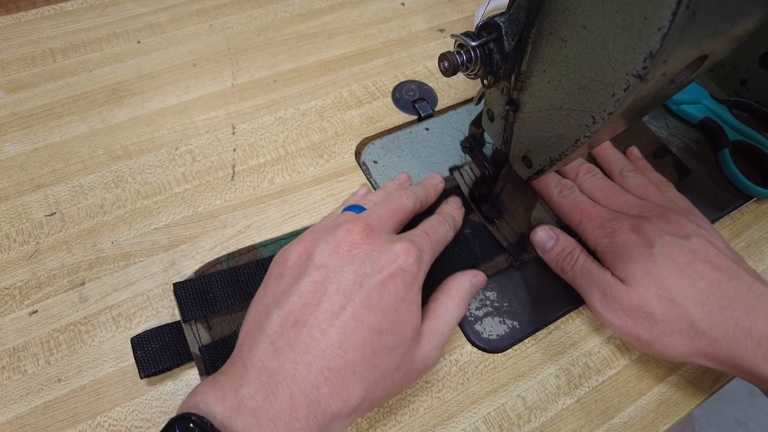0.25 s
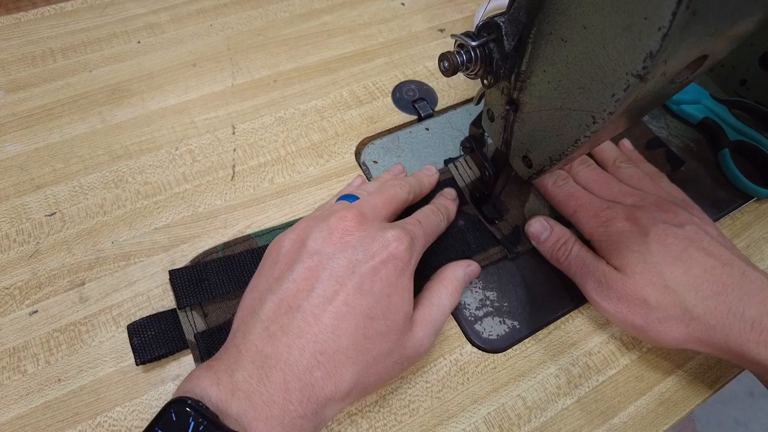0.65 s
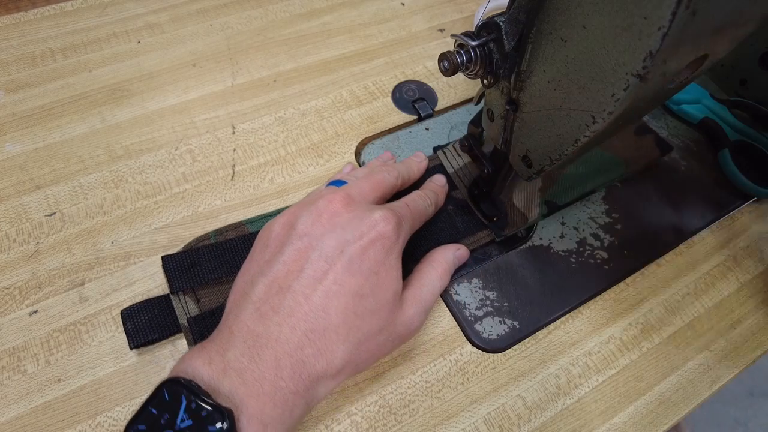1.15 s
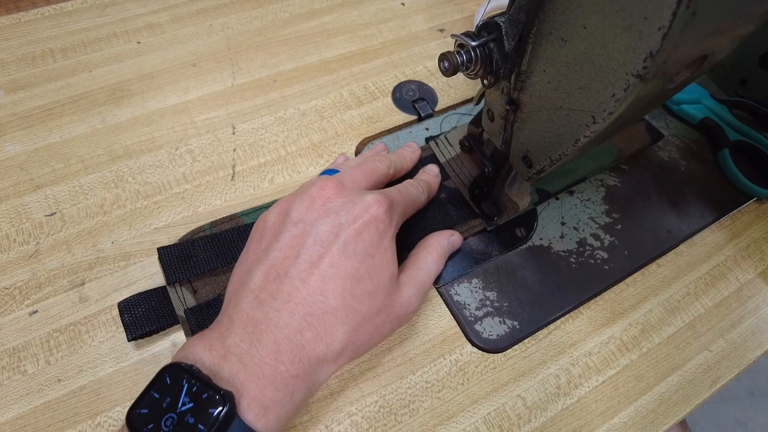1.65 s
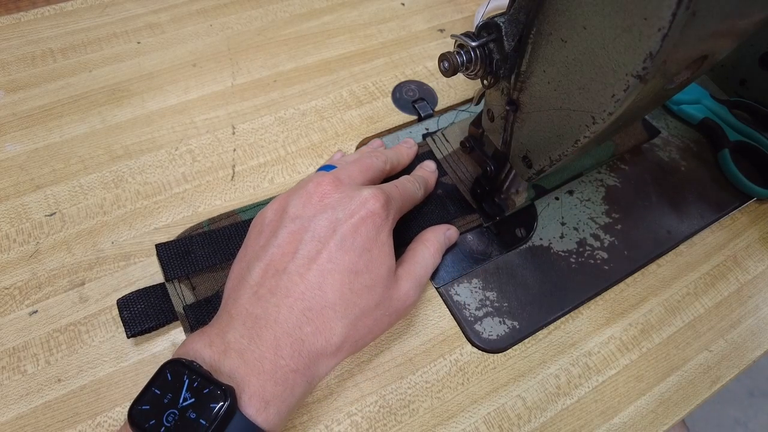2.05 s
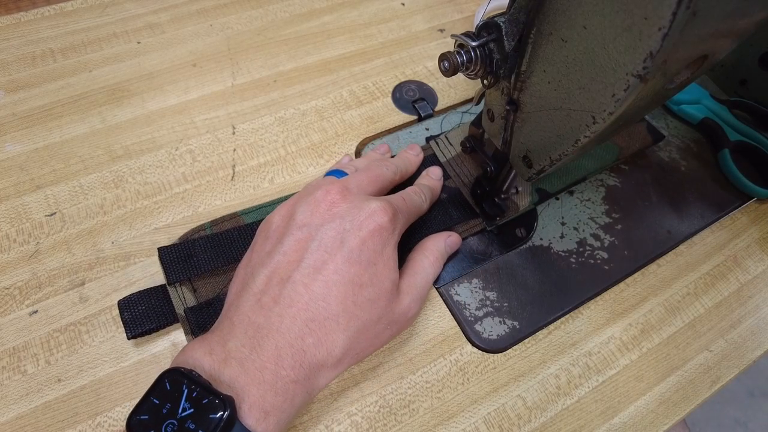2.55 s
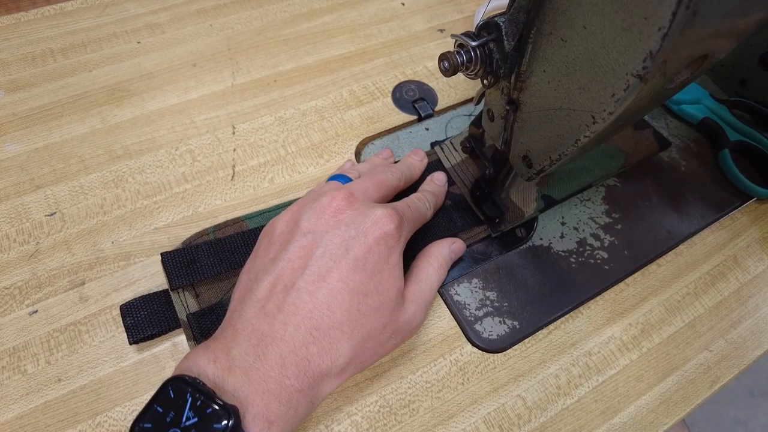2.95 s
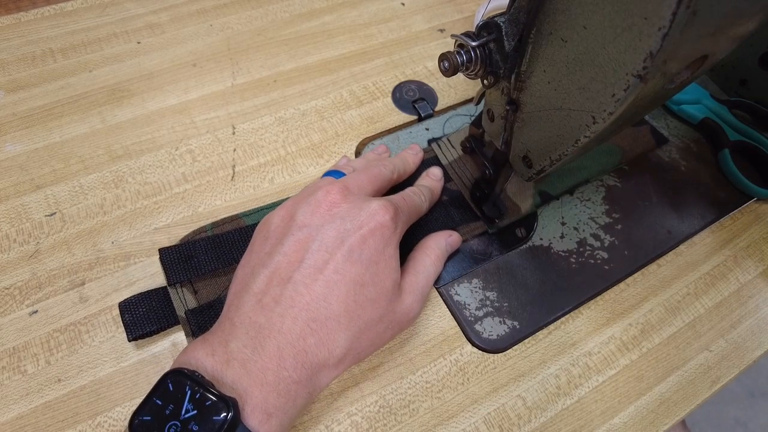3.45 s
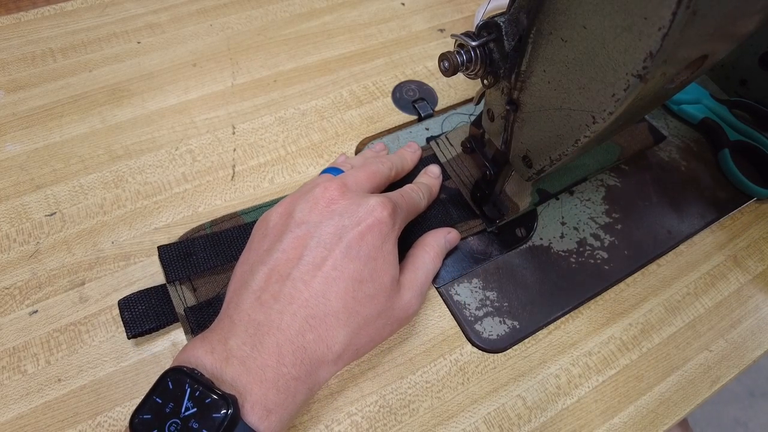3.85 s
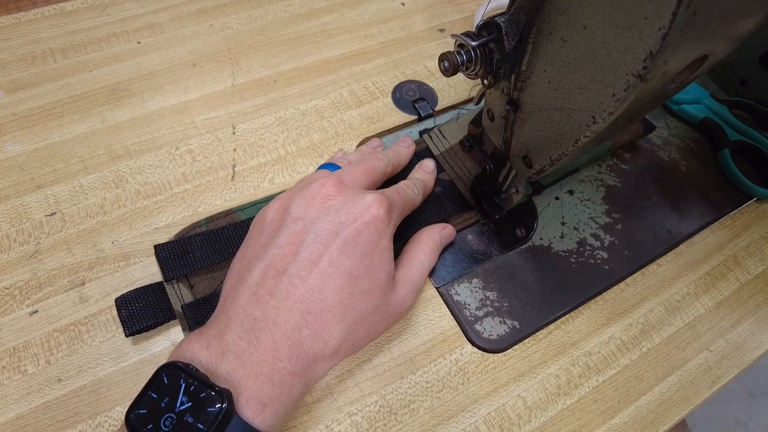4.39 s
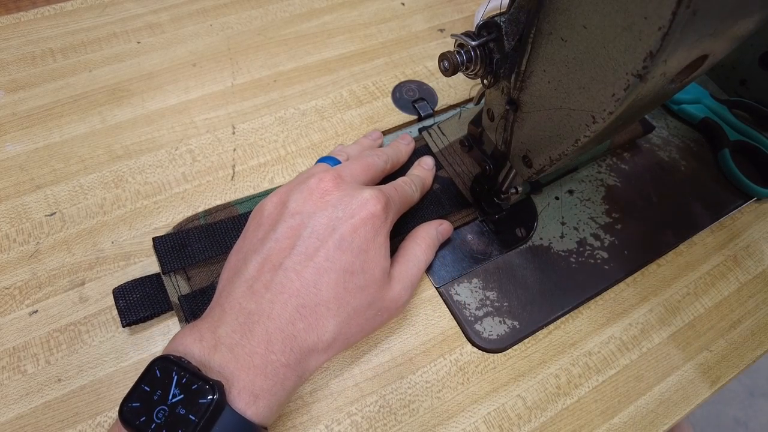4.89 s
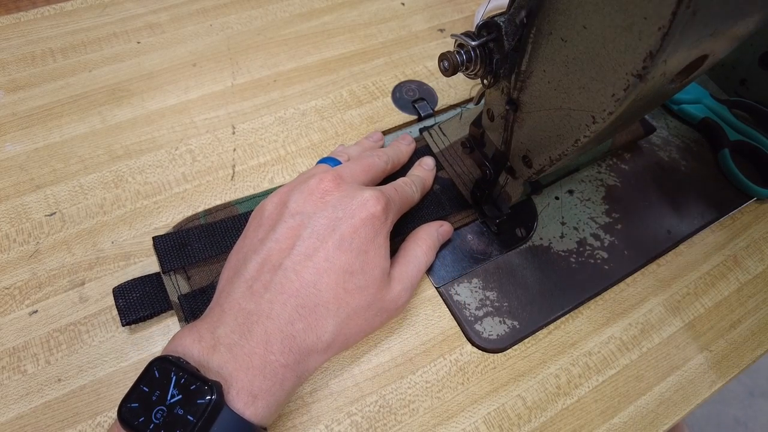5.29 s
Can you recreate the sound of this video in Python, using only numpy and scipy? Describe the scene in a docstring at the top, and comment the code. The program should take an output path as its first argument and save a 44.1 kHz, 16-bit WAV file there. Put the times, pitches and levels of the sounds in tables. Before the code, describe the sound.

Close stereo sound of a heavy industrial sewing machine on a wooden bench in a small, fairly dry workshop. It is already stitching at 0 s, about six a second, quickening to nearly nine around 1.2 s. Every stitch combines a hard steel foot knock, little hook and feed ticks, a deep bench boom near 120 Hz and a snapping take-up, with webbing rasp, grainy clatter and hiss. From 1.6 s it slows, with separate, weaker stitches at 2.2 and 2.5 s. A second burst runs from 2.7 to 3.3 s, then slows to a faint contact near 3.9 s and a short standstill. The clutch bites with a thump at 4.1 s; stitches follow at 4.25, 4.4 and 4.5 s. A brief brake rub and low shudder end it around 4.7 s. Low, wavering motor hum and soft fan air remain to 5.5 s, with a small webbing rustle and ticks near 5.25 s.

```python
"""Walking-foot sewing machine

A heavy machine on a wooden bench stitches webbing in three short bursts in a small workshop; the motor hums on.
Each shaft turn is one stitch: the foot knocks, hook and feed tick, the punch booms the bench, the take-up snaps back.
Noise-driven steel modes make the contacts; chirped cosines the booms; short swelling and fading cosines the stand;
sines the motor. Shaped grains and noise make clatter, hiss, webbing, brake and fan; clatter and hiss rise with speed."""
import sys
import numpy as np
from scipy import signal
from scipy.fft import rfft, irfft
from scipy.io import wavfile
from scipy.ndimage import uniform_filter1d, map_coordinates

SR = 44100
rng = np.random.default_rng(int(sys.argv[2]) if len(sys.argv) > 2 else 0)


def dump(signal):
    """Clip the signal to [-1, 1] and save it as 16-bit WAV at the path in sys.argv[1]."""
    limited = np.clip(np.atleast_2d(signal).T, -1, 1)
    pcm = np.round(limited * 32767).astype(np.int16)
    wavfile.write(sys.argv[1], SR, pcm)


N = 243873
T = np.arange(N) / SR


def amp(db):
    """Decibels to gain."""
    return 10 ** (np.asarray(db) / 20)


def rms_one(x):
    """Scale to unit power."""
    return x / np.sqrt(np.mean(x ** 2) + 1e-20)


def in_time(rows):
    """Interpolate the level column of a (time, level) curve at every sample."""
    time_s, level_db = np.transpose(rows)
    return np.interp(T, time_s, level_db)


def per_bin(points):
    """Interpolate a spectrum table over log frequency at every FFT bin."""
    hz, value = np.transpose(points)
    bin_hz = np.arange(N // 2 + 1) * SR / N
    return np.interp(np.log(bin_hz + 1), np.log(hz), value)


def drift(rate_hz):
    """Smooth random curve of unit power through random knots."""
    knots = rng.standard_normal(int(T[-1] * rate_hz) + 4)
    return rms_one(map_coordinates(knots, [T * rate_hz + 1], order=3))


def swell(peak_s, rise_db_per_s, fall_db_per_s):
    """Gain that climbs to one and dies away, both linearly in dB."""
    slope_db = np.minimum(rise_db_per_s * (T - peak_s), fall_db_per_s * (peak_s - T))
    return amp(np.maximum(slope_db, -120))


def resonate(x, modes):
    """Parallel two-pole resonances (pitch_hz, width_hz, gain_db) with alternating signs."""
    out = 0
    for k, (pitch_hz, width_hz, gain_db) in enumerate(modes):
        r = np.exp(-np.pi * width_hz / SR)
        zeros = np.array([1, 0, -1]) * (1 - r * r) / 2
        poles = [1, -2 * r * np.cos(2 * np.pi * pitch_hz / SR), r * r]
        out = out + (-1) ** k * amp(gain_db) * signal.lfilter(zeros, poles, x)
    return out


def grains(per_s, spread_db, smooth_db):
    """Dense tiny contacts of uneven size over smooth friction noise."""
    hits = rng.random(N) < per_s / SR
    sizes = amp(spread_db * np.minimum(rng.exponential(1, N), 4)) * hits
    contact = rms_one(sizes * rng.choice([-1, 1], (2, N)))
    return rms_one(contact + amp(smooth_db) * rng.standard_normal((2, N)))


def coloured(x, spectrum, edge_hz):
    """Give a signal a spectrum, cut it below an edge and scale to unit power."""
    shaped = irfft(rfft(x) * amp(per_bin(spectrum)), N)
    low_cut = signal.butter(2, edge_hz, "high", fs=SR, output="sos")
    return rms_one(signal.sosfilt(low_cut, shaped))


# bench and bed plate modes: pitch_hz, width_hz, gain_db
BENCH_MODES = [(152, 23.5, 2.5), (211.7, 22, 2.5), (291.8, 25, 1.5), (350, 59.6, -3), (421, 49.7, -1.5),
               (603.4, 40, -7), (774, 74, -9.5)]


def bench(force):
    """The wooden bench and bed plate ring low and absorb the treble."""
    band = signal.butter(2, [130, 1000], "band", fs=SR, output="sos")
    return signal.sosfilt(band, resonate(force, BENCH_MODES))


# one stitch per shaft turn: foot_s, knock_db, boom_db, rock_db, feed_tick_db, take_up_tick_db
STITCHES = [(-.02, -28.5, -18.5, -26, -40, -34.5), (.149, -29, -17.5, -33, -36.5, -32),
            (0.3097, -31, -14.5, -38, -39, -32), (.4541, -29.5, -14.5, -34, -39, -32.5),
            (0.591, -31, -19, -33, -30.5, -35.5), (0.7194, -30, -16, -37, -29.5, -33),
            (0.8434, -31.5, -15, -34, -42, -37.5), (.963, -29.5, -14.5, -37, -41, -28.5),
            (1.081, -30.5, -15.5, -31, -32.5, -33), (1.1918, -30.5, -12.5, -33, -29.5, -40),
            (1.3038, -29.5, -17, -37, -42, -36), (1.4225, -31.5, -15.5, -36, -40, -39.5),
            (1.549, -31.5, -17, -32, -38, -37.5), (1.6833, -30.5, -16, -30, -38, -39),
            (1.8344, -32, -21, -28, -36.5, -36.5), (2.0071, -28.5, -23, -33, -39, -39.5),
            (2.2369, -31, -28.5, -32, -56, -58), (2.5165, -33.5, -34, -33.5, -51, -47),
            (2.724, -33.5, -17.5, -35, -36, -37), (2.8711, -29.5, -15.5, -39, -35, -32),
            (2.9916, -28.5, -16.5, -35, -35, -30), (3.0952, -28, -14.5, -36, -43, -34),
            (3.2033, -28.5, -19.5, -37, -46, -34), (3.3339, -32.5, -20.5, -31, -55, -43.5),
            (3.504, -31, -28.5, -31, -47, -63), (3.8648, -41.5, -47, -54, -49, -36),
            (4.252, -31, -15.5, -32, -38, -33), (4.3901, -29.5, -14, -29, -33.5, -37),
            (4.5324, -35.5, -30.5, -32, -36.5, -64)]
STOP_S = 4.72                    # last turn ends
PAUSE_S, PAUSE_LENGTH_S = 3.98, .16  # shaft stands still within one slow stitch


def time_of(turns):
    """Time of a shaft angle: a smooth curve through the falls of the foot, with one pause."""
    falls_s = np.array([row[0] for row in STITCHES] + [STOP_S])
    running_s = falls_s - PAUSE_LENGTH_S * (falls_s > PAUSE_S)
    running_s = np.pad(running_s, 4, "reflect", reflect_type="odd")
    s = map_coordinates(running_s, [turns + 4], order=3, mode="nearest")
    return s + PAUSE_LENGTH_S * (s > PAUSE_S)


def strikes(turn_share, lag_s):
    """When one part strikes in every stitch: share of a turn after the foot, plus lag from linkage play."""
    return time_of(np.arange(len(STITCHES)) + turn_share) + lag_s


BRAKE_S, BRAKING_DB_PER_S = 4.613, 71
FULL_SPEED_PER_S = 8   # stitch rate at which the speed-dependent levels hold
CREEP_PER_S = 2.23     # slipping clutch keeps the gear as noisy as at this stitch rate


def shaft():
    """Shaft angle (turns) and its noise-driving speed (doublings above full speed) at every sample."""
    turns = np.linspace(0, len(STITCHES), N)
    angle = np.interp(T, time_of(turns), turns)
    speed = uniform_filter1d(np.gradient(angle, T), size=SR // 5)
    speed = np.maximum(speed, CREEP_PER_S)
    braking = amp(-BRAKING_DB_PER_S * np.maximum(T - BRAKE_S, 0))
    speed = np.where(T < BRAKE_S, speed, np.interp(BRAKE_S, T, speed) * braking)
    return angle, np.log2(np.abs(speed) / FULL_SPEED_PER_S + 1e-9)


# fan air spectrum: pitch_hz, density_db (relative, per Hz)
FAN = [(30, 12), (50, -4), (80, 5.5), (200, -6.5), (420, -3.5), (680, -23), (950, -25.5), (1300, -16),
       (1900, -27.5), (2800, -24), (5500, -33), (7000, -37), (9000, -34), (15000, -55)]


def fan():
    """Fan air of the idling motor: steady coloured noise."""
    return amp(-46.5) * coloured(rng.standard_normal((2, N)), FAN, edge_hz=34)


# hum at twice the mains rate: time_s, level_db
HUM = [(.15, -34), (.45, -28.5), (.72, -37.5), (1.97, -31), (2.5, -34.5), (2.66, -27.5), (2.73, -33.5),
       (3.5, -32.5), (3.92, -29), (4.07, -35), (4.65, -31.5), (4.8, -27), (5.15, -26), (5.33, -31.5),
       (5.53, -25.5)]
# lines of motor and pulley: pitch_hz, level_db (before waver)
MOTOR_LINES = [(48.6, -55.5), (178, -85), (238, -53.5), (280, -58.5), (360, -55), (603, -65), (764, -74)]


def motor(waver_db):
    """Mains hum, swelling and sinking, with faint lines unsteady in level and phase."""
    hum_hz = 120
    hum = amp(in_time(HUM)) * np.sin(2 * np.pi * hum_hz * T + 0.16 * drift(3.79))
    lines = 0
    for pitch_hz, level_db in MOTOR_LINES:
        level = amp(level_db + waver_db * drift(7))
        lines = lines + level * np.sin(2 * np.pi * pitch_hz * T + 1.08 * drift(6))
    return np.sqrt(2) * (hum + lines)


# bench rumble, before the punches' load: time_s, level_db
RUMBLE = [(0, -39.5), (.45, -41), (1.05, -37.5), (1.85, -39), (2.1, -37), (2.24, -43.5), (2.7, -40.5),
          (3.1, -36.5), (3.55, -40.5), (3.8, -50.5), (4.1, -50.5), (4.35, -41.5), (4.6, -39.5),
          (4.95, -53.5), (5.53, -52)]
# clatter spectrum: pitch_hz, density_db (relative, per Hz)
CLATTER = [(500, 0), (800, 0.5), (950, 1), (1350, 3.5), (1750, 0), (2150, -1.5), (2700, -1), (3300, -1),
           (3650, -8.5), (4200, -3.5), (5000, -14), (6500, -24.5)]
# hiss spectrum: pitch_hz, density_db (relative, per Hz)
HISS = [(4000, 0.5), (5000, 2), (5650, -0.5), (6900, -1.5), (7550, 0), (8300, -1), (9200, -2),
        (10200, -4.5), (11400, -2), (14000, -11.5), (15500, -5.5)]


def running_gear(angle, speed, load):
    """Clatter and hiss grow with speed and swell once a turn; bench rumble follows its own curve and the punches."""
    def level(full_speed_db, db_per_doubling, swing_db, peak_turn):
        swing = swing_db * np.cos(2 * np.pi * (angle - peak_turn))
        return amp(full_speed_db + db_per_doubling * speed + swing)

    drive = grains(per_s=450, spread_db=2.5, smooth_db=1.5) * amp(3.2 * drift(110))
    rub = rms_one(drive + amp(3.5) * rng.standard_normal((2, N)))   # thread and webbing slide more evenly
    shaking = rms_one(bench(grains(per_s=300, spread_db=3.5, smooth_db=-2.5)))
    rumble = shaking * amp(in_time(RUMBLE) + 5.5 * load)
    clatter = coloured(drive, CLATTER, edge_hz=360) * level(-42.5, 7, 1, 0.3)
    hiss = coloured(rub, HISS, edge_hz=2760) * level(-45.5, 11.5, 1.6, 0.27)
    return rumble + clatter + hiss


def webbing_shift():
    """The webbing shifts under the hand after the stop, rubbing briefly over the bed plate."""
    rub = grains(per_s=300, spread_db=5.5, smooth_db=2.0)
    rustle = amp(-52.5) * coloured(rub, CLATTER, edge_hz=350)
    rumble = amp(-50.5) * rms_one(bench(rub))
    return (rustle + rumble) * swell(peak_s=5.245, rise_db_per_s=303, fall_db_per_s=31)


def webbing_drag():
    """After each fall of the foot the feed rasps the webbing over the plate, harder after a harder knock."""
    foot_s, knock_db = np.transpose(STITCHES)[:2]
    last = np.maximum(np.searchsorted(foot_s, T) - 1, 0)
    fade_db_per_s = 103
    pull = amp(knock_db[last] - fade_db_per_s * (T - foot_s[last]))
    pull = uniform_filter1d(pull, size=300)
    rub = grains(per_s=900, spread_db=2.0, smooth_db=4.5)
    hiss = amp(-16) * coloured(rub, HISS, edge_hz=2400)
    clatter = amp(-19) * coloured(rub, CLATTER, edge_hz=1020)
    return pull * (hiss + clatter)


# head modes that sing under the brake: pitch_hz, width_hz, gain_db
RING_MODES = [(1290, 110, 1), (7550, 200, -21.5)]


def brake():
    """Brake friction swells and fades, making two head modes sing and the bench rumble."""
    narrow = resonate(rng.standard_normal((2, N)), RING_MODES)
    sing = rms_one(resonate(narrow, [(1340, 1200, 0.0048), (7550, 900, 0.0043)]))
    rumble = rms_one(bench(rng.standard_normal((2, N))))
    friction = swell(peak_s=4.69, rise_db_per_s=148, fall_db_per_s=70)
    return friction * (amp(-46.5) * sing + amp(-39) * rumble)


# jolts of the bed plate: start_s, level_db
JOLTS = [(2.078, -34.5), (2.105, -38), (3.178, -29), (3.192, -31), (4.611, -44), (5.249, -43)]


def jolts(contact_s, size=6000):
    """Short blows on the bed plate: decaying noise rings the bench modes."""
    out = np.zeros((2, N + size))
    press = np.exp(-np.arange(size) / SR / contact_s)
    blows = bench(rng.standard_normal((len(JOLTS), 2, size)) * press)
    for (start_s, level_db), blow in zip(JOLTS, blows):
        at = round(start_s * SR)
        onset_rms = blow[:, :size // 8].std(axis=1, keepdims=True)
        out[:, at:at + size] += amp(level_db) * blow / onset_rms
    return out[:, :N]


def stand(pushes, pitch_hz, length_s):
    """Slow pushes (peak_s, level_db) rock the steel stand for a few cycles, each slightly detuned."""
    out = np.zeros(N)
    for (peak_s, level_db), detune in zip(pushes, rng.normal(1, 0.087, len(pushes))):
        near = np.abs(T - peak_s) < .12
        t = T[near] - peak_s
        shape = amp(level_db) * np.exp(-(t / length_s) ** 2)
        out[near] += np.sqrt(2) * shape * np.cos(2 * np.pi * pitch_hz * detune * t)
    return out


# stand shudders as clutch or brake takes hold: peak_s, level_db
SHUDDERS = [(4.11, -40), (4.65, -39), (4.72, -31)]


def rocking(punch_s, rock_db):
    """The stand rocks just before each boom and shudders more slowly under clutch and brake."""
    rock_lead_s = .021
    rocks = stand(list(zip(punch_s - rock_lead_s, rock_db)), pitch_hz=72.6, length_s=0.02)
    return rocks + stand(SHUDDERS, pitch_hz=49, length_s=0.043)


def boom(punches, pitch_hz, climb_hz_per_s, swell_s, fade_s, overtone_db, third_db):
    """The bench top swings up around each punch, its pitch climbing; also gives the load, scaled to peak one."""
    out, load = np.zeros(N), np.zeros(N)
    for peak_s, level_db in punches:
        near = slice(max(int((peak_s - .1) * SR), 0), int((peak_s + .1) * SR))
        t = T[near] - peak_s
        span_s = np.where(t < 0, swell_s, fade_s)
        shape = amp(level_db) * np.exp(-np.abs(t / span_s) ** 3.33)
        phase = 2 * np.pi * (pitch_hz * t + climb_hz_per_s * t * t / 2)
        wave = np.cos(phase) + amp(overtone_db) * np.cos(2 * phase) + amp(third_db) * np.cos(3 * phase)
        out[near] += np.sqrt(2) * shape * wave
        load[near] += shape
    return out, load / load.max()


# modes of the head: pitch_hz, width_hz, knock_gain_db, clack_gain_db, tick_gain_db (before chance)
HEAD_MODES = [(1063, 24, 0, 5, 5.5), (1365, 140, -3.5, 6, 0.5), (1724, 90, 11, 1.5, 7),
              (2640, 174, 3, -4.5, 3.5), (3300, 280, -5.5, -21, -2.5), (4000, 120, 2, -24, -2),
              (4560, 246, 1, -10.5, 2), (5570, 280, -4.5, -16, 0), (6430, 230, -7.5, -9, -4),
              (7660, 250, -9.5, -28, -5.5), (9180, 430, -17.5, -16.5, -5), (11180, 610, -33, -37, -8.5),
              (13300, 650, -32, -33, -9.5), (15100, 910, -15, -32, -16)]
KNOCK, CLACK, TICK = 2, 3, 4   # gain columns


def contacts(rows, column, contact_s, scrape_db, slide_db, vary_db=2.5, size=2400):
    """Steel slides, meets and scrapes, ringing the head unevenly; gives shared and scattered sound.

    Rows: contact time (s), level_db and optionally bright_db."""
    lead = size // 4
    rows = [row for row in rows if row[0] > 0]
    t = (np.arange(size) - lead) / SR
    slide = amp(slide_db) * np.exp(-np.abs(t) / 0.013)
    press = np.where(t < 0, slide, np.exp(-np.abs(t) / contact_s))
    press = uniform_filter1d(press, size=36)
    force = rng.standard_normal((len(rows), 2, size)) * press * amp(scrape_db)
    force[:, 0, lead + 20] += 1   # the meeting itself, shared only
    chance_db = vary_db * rng.standard_normal((len(rows), len(HEAD_MODES), 1, 1))
    modes = [(m[0], m[1], m[column] + chance_db[:, k]) for k, m in enumerate(HEAD_MODES)]
    rings = resonate(force, modes)

    out = np.zeros((2, N + 2 * size))
    split = signal.butter(1, 5000, fs=SR)
    for (hit_s, level_db, *bright_db), ring in zip(rows, rings):
        dull = signal.lfilter(*split, ring)
        ring = dull + (ring - dull) * amp(sum(bright_db))
        onset_power = np.mean(ring[:, lead:lead + SR // 200] ** 2, axis=1, keepdims=True)
        at = round(hit_s * SR)
        out[:, at:at + size] += amp(level_db) * ring / np.sqrt(onset_power)
    return out[:, lead:lead + N]


# clacks of drive slack as it slows or pulls away: hit_s, level_db
CLACKS = [(2.6922, -40), (3.6453, -50), (4.1643, -37.5), (4.7127, -49)]
# further steel ticks, some from slow stitches: hit_s, level_db, bright_db
EXTRA_TICKS = [(2.4424, -44.5, -4), (2.6733, -43, 3), (3.182, -31, -14), (3.8643, -46, -5),
               (3.9648, -44, -18), (4.1893, -39.5, 1), (5.2467, -50, -11), (5.2632, -47, -3),
               (5.3507, -45.5, -5)]


def linkage(speed):
    """Knocks, clacks and ticks of the machine; harder hook, feed and take-up ticks are brighter."""
    foot_s, knock_db, _, _, feed_db, take_up_db = np.transpose(STITCHES)
    hook_s = strikes(.075, lag_s=.0035)
    feed_s = strikes(.19, lag_s=.007)
    bar_s = strikes(.44, lag_s=.002)
    take_up_s = strikes(.725, lag_s=.0085)

    def by_speed(hit_s, full_speed_db, db_per_doubling):
        return full_speed_db + db_per_doubling * np.interp(hit_s, T, speed)

    hook_db = knock_db - 7
    steel = [*zip(hook_s, hook_db), *zip(feed_s, feed_db), *zip(take_up_s, take_up_db)]
    steel = [(s, db, max(3 + 1.3 * (db + 35), -14)) for s, db in steel]   # bright_db, floored at -14
    needle_bar = [(s, db, -10) for s, db in zip(bar_s, by_speed(bar_s, -37, 5.5))]
    take_up = list(zip(take_up_s, by_speed(take_up_s, -38.5, 4.5)))

    knocks = contacts(list(zip(foot_s, knock_db)), KNOCK, contact_s=0.0029, scrape_db=7, slide_db=-19)
    clacks = contacts([*take_up, *CLACKS], CLACK, contact_s=0.002, scrape_db=11, slide_db=-18)
    ticks = contacts([*steel, *needle_bar, *EXTRA_TICKS], TICK, contact_s=.0018, scrape_db=-3, slide_db=-18)
    return knocks + clacks + ticks


def workshop(x, t60_s, wet_db):
    """Dense reflections from bench and near walls: a decaying noise tail."""
    t = T[:SR // 2]
    tail = rng.standard_normal((2, len(t))) * amp(-60 * t / t60_s) * (t > .003)
    tail /= np.sqrt(np.sum(tail ** 2, axis=1, keepdims=True))
    return x + amp(wet_db) * signal.fftconvolve(x, tail, axes=1)[:, :N]


# left-right likeness: pitch_hz, correlation
LIKENESS = [(110, .995), (200, .96), (380, .85), (700, .55), (1300, .76), (2400, .6), (4400, .5),
            (8100, .7), (15000, .68)]
# phase by which left leads: pitch_hz, lead_rad
LEAD = [(120, -.16), (300, -.08), (430, -.15), (690, -.8), (1550, -.2), (2330, -.9), (2760, -.7),
        (4400, -1.5), (5200, -1.8), (7500, -.2), (15800, 0)]
# left minus right: pitch_hz, balance_db
BALANCE = [(120, .2), (700, 0), (1400, 1.1), (2800, -1.5), (5600, -1.8), (10000, -.6), (14000, -1.6)]


def microphones(x):
    """Shared and scattered sound reach two ports with differing phase and level."""
    shared, scattered = rfft(x)
    alike = np.clip(per_bin(LIKENESS), 0, 1)
    sides = np.array([[1], [-1]])
    pair = np.sqrt((1 + alike) / 2) * shared + sides * np.sqrt((1 - alike) / 2) * scattered
    level = amp(sides * per_bin(BALANCE) / 2)
    phase = np.exp(.5j * sides * per_bin(LEAD))
    return irfft(pair * level * phase, N)


def scene():
    """Machine head in the room, over the bench's boom and the motor."""
    angle, speed = shaft()
    punch_s = strikes(0.2212, lag_s=0.03076)
    boom_db, rock_db = np.transpose(STITCHES)[2:4]
    clutch_bite = (4.122, -27)   # peak_s, level_db: the clutch bites again and booms the bench
    thumps, load = boom([*zip(punch_s, boom_db), clutch_bite], pitch_hz=121.3, climb_hz_per_s=430,
                        swell_s=0.023, fade_s=0.028, overtone_db=-28.5, third_db=-29)
    sound = fan() + running_gear(angle, speed, load)
    sound += webbing_shift() + webbing_drag()
    sound += brake() + jolts(contact_s=0.0062)
    sound += workshop(linkage(speed), t60_s=0.17, wet_db=-6.0)
    # long waves enter the shared channel only
    sound[0] += motor(waver_db=3) + rocking(punch_s, rock_db) + thumps
    return microphones(sound)


def record(dry):
    """Steep elliptic low-pass cuts the top."""
    cutoff_hz = 15900
    return signal.sosfilt(signal.ellip(12, .1, 80, cutoff_hz, fs=SR, output="sos"), dry)


dry = scene()
out = record(dry)
dump(out)
```